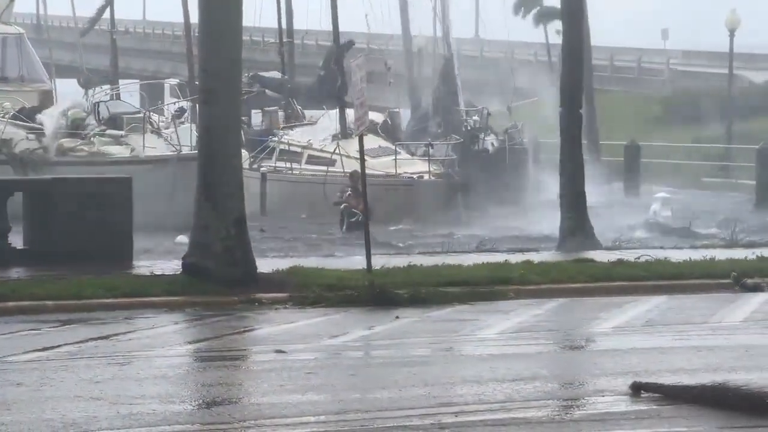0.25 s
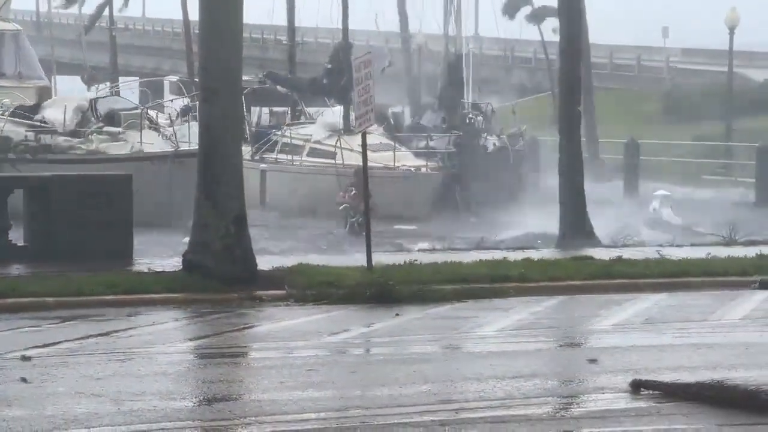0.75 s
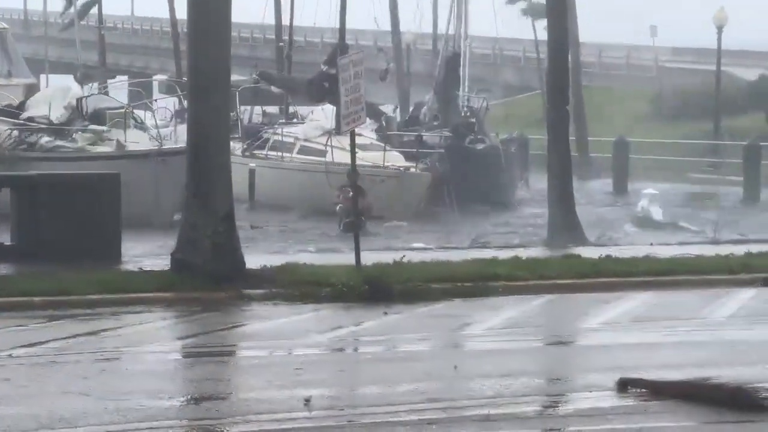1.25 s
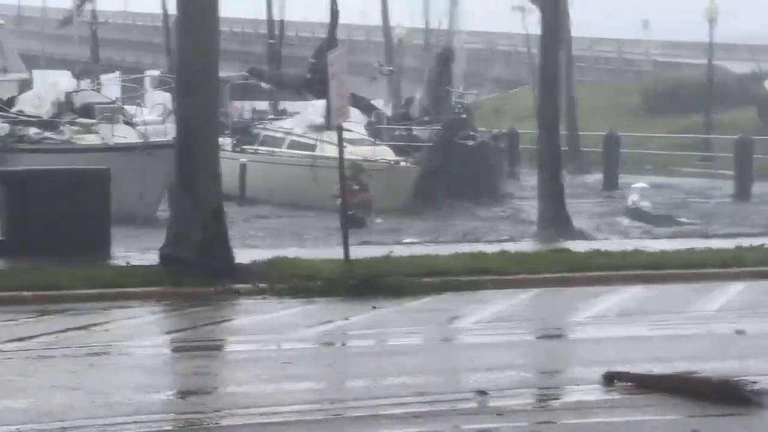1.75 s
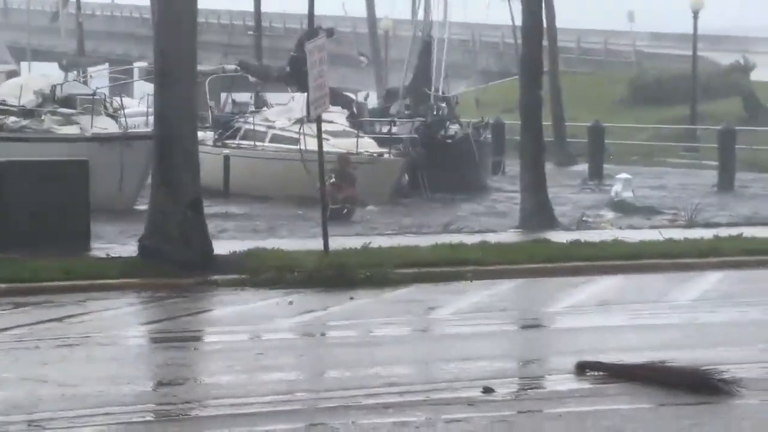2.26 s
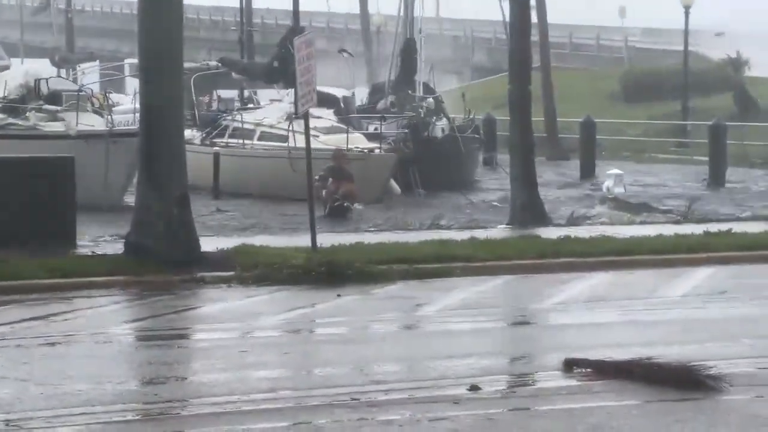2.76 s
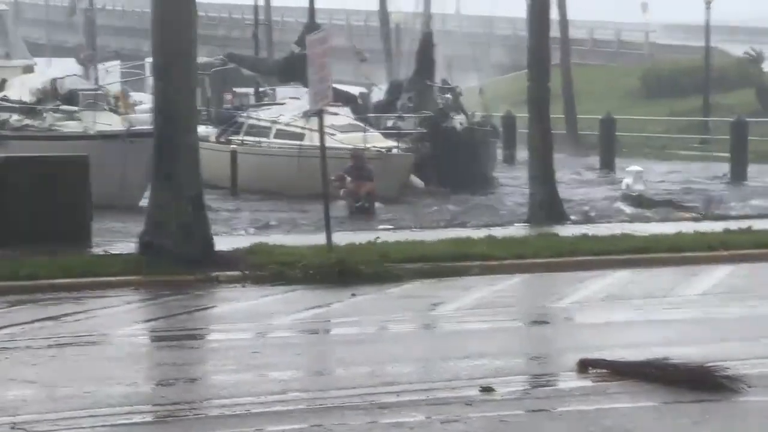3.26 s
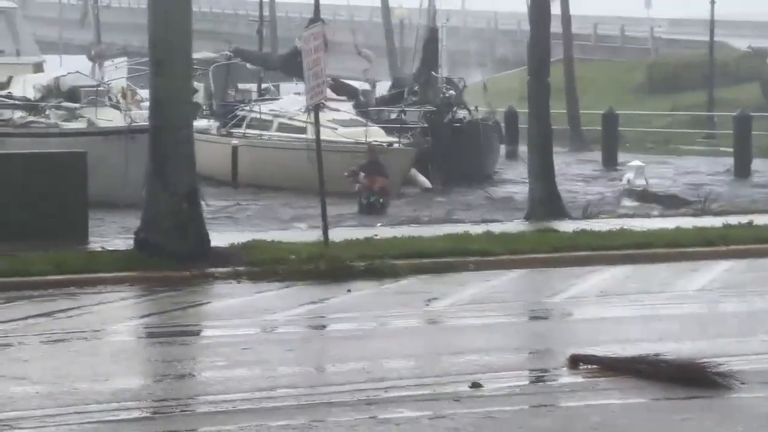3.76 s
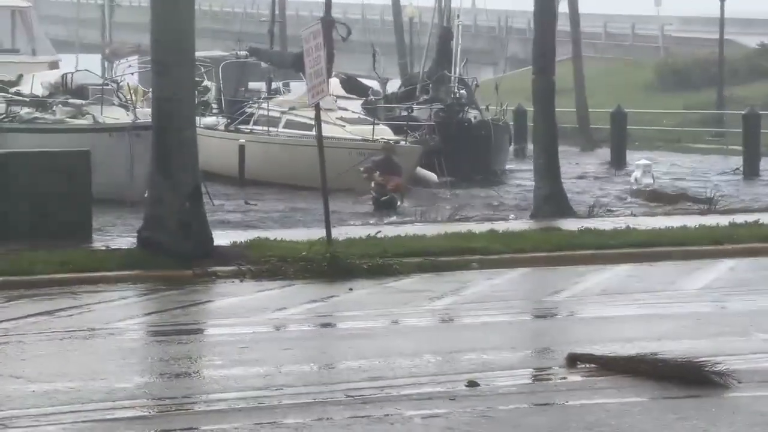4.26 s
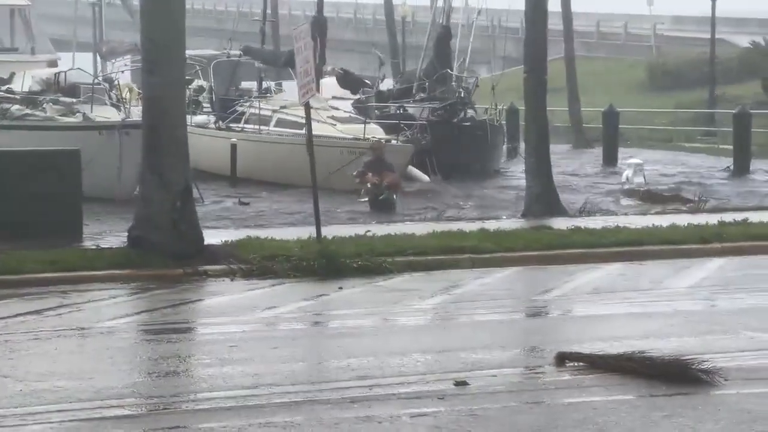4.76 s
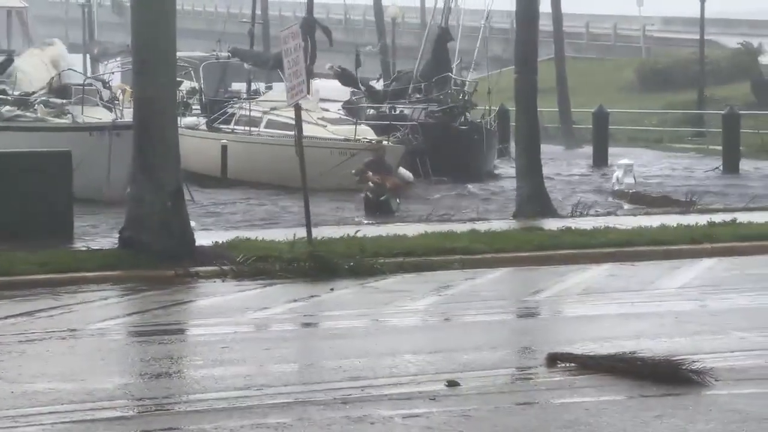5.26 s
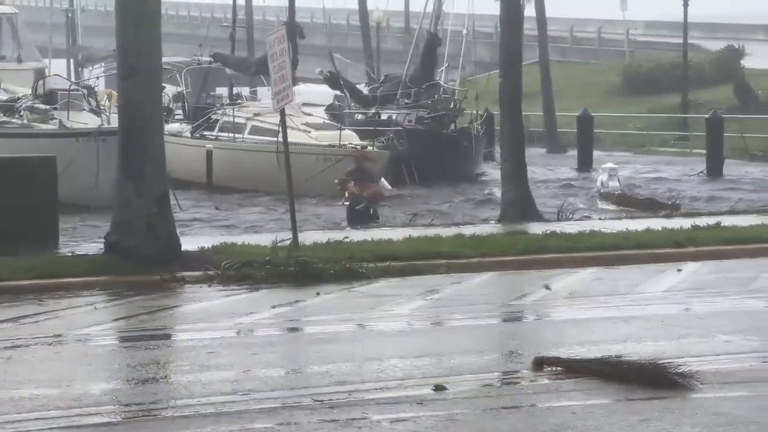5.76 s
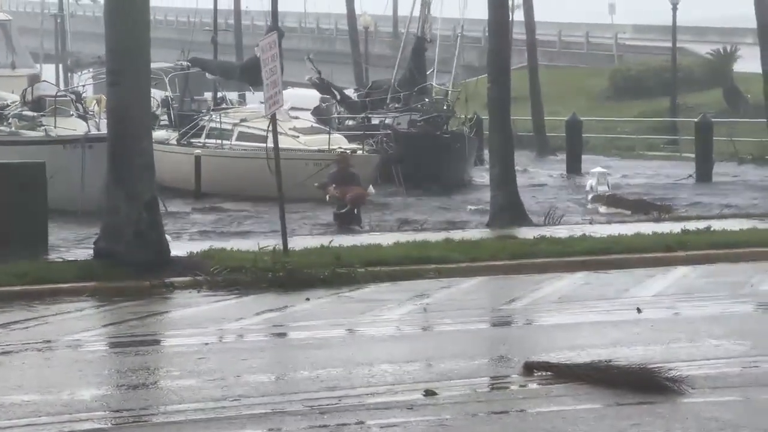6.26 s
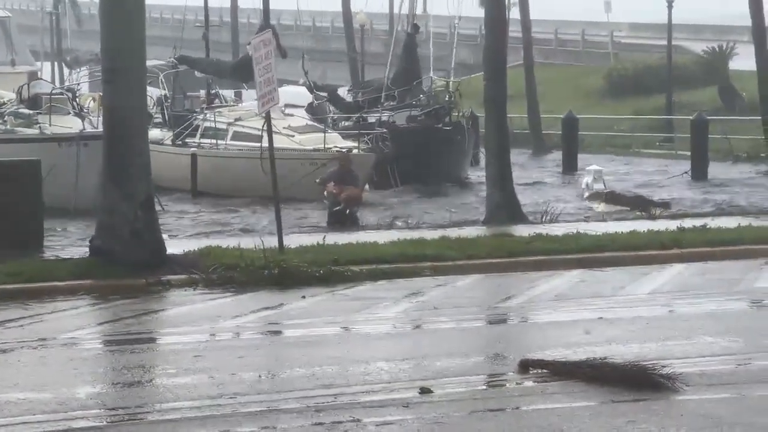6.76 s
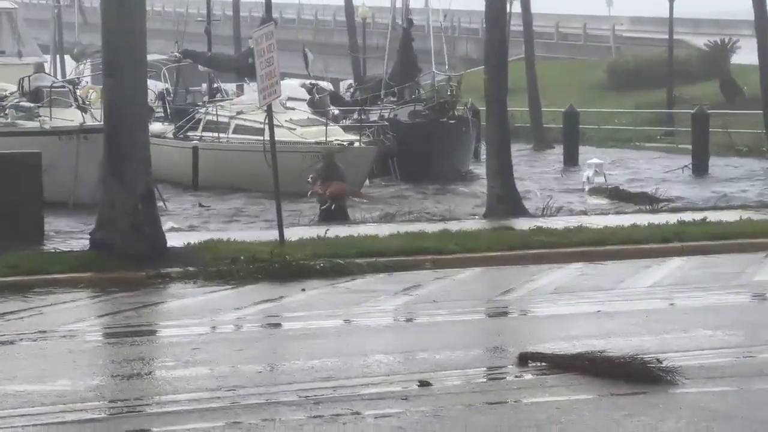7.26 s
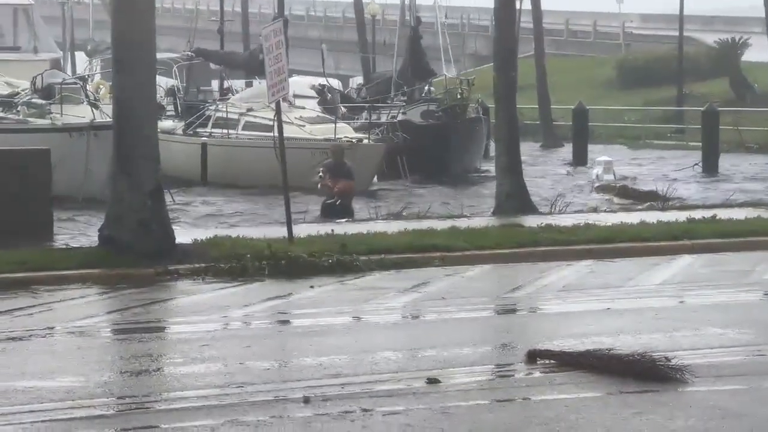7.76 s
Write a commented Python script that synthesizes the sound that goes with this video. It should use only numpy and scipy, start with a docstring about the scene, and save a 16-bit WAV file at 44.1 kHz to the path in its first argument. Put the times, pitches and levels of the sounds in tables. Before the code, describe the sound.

Violent wind buffets the microphone, thumping and popping densely, then lulls and returns as low hollow hooting gusts, with a few raindrop ticks.

```python
"""Storm wind tears across the microphone ports of a phone for eight seconds, over a far roar of trees and spray.
From the start, uneven noise makes rumble and ragged buffeting; noise bursts make puffs, falling chirps make pops.
The hardest puffs and pops crowd in from 1.2 s, with fine spray crackling on surges of air; a raindrop ticks at 2.4 s.
After a lull past 3.3 s a drop clicks and rings at 4.5 s, and a hollow, a resonance in the eddies, starts to howl.
The howl peaks near 6.2 s among strong gusts, with drops at 6.1 and 7.0 s, and the wind blows on to the end."""
import sys
import numpy as np
from scipy import signal
from scipy.fft import rfft, irfft, next_fast_len
from scipy.io import wavfile
from scipy.ndimage import uniform_filter1d, minimum_filter1d, map_coordinates

SR = 44100
rng = np.random.default_rng(int(sys.argv[2]) if len(sys.argv) > 2 else 0)


def store_pcm(level_fs):
    """Save levels as 16-bit WAV."""
    pcm = np.round(np.clip(level_fs, -1, 1) * 32767).astype(np.int16)
    wavfile.write(sys.argv[1], SR, np.atleast_2d(pcm).T)


N = 353531

# Event and wind levels are set ahead of any port filter and the limiter; colours give relative level per Hz.
# Wind between the gusts: t/s, buffeting level/dB, rumble level/dB
STEADY_WIND = [(0, -33.5, -26.5), (.58, -29, -38.5), (.85, -29, -30.5), (1.351, -31, -25.5),
               (1.9, -33, -25.5), (2.4, -26.5, -27), (2.899, -38, -28.5), (3.251, -30.5, -27),
               (3.5, -39, -35), (4.101, -41.5, -40), (4.399, -34.5, -30.5), (4.718, -41, -36),
               (5.2, -29.5, -27.5), (5.599, -33, -27), (6.1, -18.5, -26), (6.8, -20, -24),
               (7.151, -39, -33.5), (7.35, -29.5, -31), (7.75, -30, -30), (8.02, -27, -34)]
# Gusts over it: start t/s, held t/s, buffeting level/dB, rumble level/dB
GUST_EVENTS = [(0, 0.056, -16, -19), (0.104, 0.012, -23.5, -23.5), (0.209, 0.025, -21.5, -30),
               (0.288, .05, -25.5, -22.5), (0.599, 0.017, -25, -22), (0.659, 0.042, -17.5, -25),
               (0.78, 0.056, -36, -23), (.87, 0.052, -20.5, -23.5), (1.0, 0.019, -17.5, -27.5),
               (1.086, 0.19, -15, -20.5), (1.361, .13, -17, -18), (1.518, 0.12, -20.5, -15.5),
               (1.717, .09, -21.5, -20.5), (1.844, 0.005, -27, -30), (1.901, 0.019, -18.5, -28),
               (1.975, 0.061, -24, -32.5), (2.073, 0.046, -23.5, -20), (2.154, 0.13, -20.5, -25),
               (2.301, 0.063, -16, -14.5), (2.418, 0.11, -22, -25.5), (2.579, 0.045, -23, -20.5),
               (2.688, 0.12, -29.5, -21), (2.967, 0.24, -25.5, -31.5), (3.602, 0.16, -41.5, -47),
               (3.687, 0.03, -32, -31), (4.126, 0.065, -28.5, -37), (4.158, 0.026, -22.5, -30.5),
               (4.23, 0.11, -24, -39), (4.398, 0.1, -26, -27.5), (4.512, 0.066, -30.5, -29.5),
               (4.822, .08, -30, -35.5), (5.333, 0.1, -25, -36.5), (5.488, .12, -23, -25.5),
               (5.683, 0.091, -21.5, -28), (5.818, 0.13, -22.5, -30), (6.029, 0.091, -15, -21.5),
               (6.186, 0.054, -13.5, -15), (6.417, 0.071, -15, -25), (6.529, 0.097, -19.5, -21.5),
               (6.819, 0.086, -17, -23.5), (7.037, 0.03, -27.5, -26), (7.19, 0.071, -21.5, -28.5),
               (7.508, 0.061, -25.5, -24.5), (7.602, 0.15, -24.5, -24), (7.699, 0.26, -21.5, -22),
               (7.843, 0.11, -26.5, -28.5), (7.992, .04, -20, -24)]
# Far roar when the smoothed buffeting is at -22.5 dB: t/s, level/dB
FAR_ROAR = [(0, -43), (1, -45.5), (1.5, -46.5), (2.1, -46), (2.4, -40), (2.8, -49.5), (3.3, -44.5),
            (4.7, -44), (6, -42), (7, -44), (8.02, -44.5)]
# Colour of the far roar: f/Hz, level/dB
ROAR_COLOUR = [(300, -16), (900, 0), (1300, 1), (1800, -4.5), (2300, -16), (3000, -20), (3350, -24),
               (3750, -34), (5500, -45.5), (9000, -51), (10300, -51.5), (11500, -100)]
# Specks of spray at set times, strong and faint: t/s, level/dB (set for the core at full strength)
SET_SPECKS = [(0.032, -34.5), (1.094, -40.5), (1.1282, -36.5), (1.15, -41), (1.185, -43), (1.228, -36),
              (1.2693, -30), (1.3728, -33), (1.4118, -30), (1.4645, -37), (1.52, -36), (1.5429, -31.5),
              (1.548, -34.5), (1.578, -37.5), (1.613, -39.5), (1.6192, -33), (1.6463, -40), (1.7531, -38),
              (1.7763, -30), (1.778, -35), (1.81, -37), (1.85, -40.5), (1.91, -48), (2.321, -34),
              (2.343, -38.5), (2.377, -32.5), (2.44, -37), (2.466, -36), (2.5117, -50), (2.593, -38),
              (2.9732, -60), (2.9948, -34.5), (3.04, -52), (3.0869, -39.5), (3.1284, -34), (3.2137, -41.5),
              (3.9483, -42.5), (4.244, -42.5), (4.262, -46), (4.298, -41.5), (4.4267, -35), (4.444, -51),
              (5.6435, -47), (5.92, -39), (6.041, -35), (6.053, -41), (6.076, -35), (6.45, -37),
              (6.5884, -35.5), (6.876, -36)]
# Colour of a speck's sharp core: f/Hz, level/dB
SPECK_COLOUR = [(700, -27.5), (1800, 10), (3000, 3), (4500, -14.5), (6500, -25), (9000, -45.5),
                (11000, -75.5)]
# Raindrops: t/s, click peak level/dB, ring level/dB, left-right level/dB, ring t60/s, click low cut f/Hz
RAINDROPS = [(2.419, -27, -20, -3, .02, 12000), (4.4706, -13.5, 15, 2, .013, 500),
             (6.1065, -19, 2, 2, .02, 5000), (7.034, -11.5, 15.5, 3, .017, 700)]
# Colour of a raindrop's click: f/Hz, level/dB
CLICK_COLOUR = [(300, 7.5), (1200, 19), (3000, -0.5), (6000, -19.5), (8500, -32.5), (10500, -47.5),
                (16000, -55)]
# Pops at set times: t/s, peak level/dB, glide t/s, cycles per e-fold of the glide
POP_EVENTS = [(0.6156, -12, 0.0022, 0.84), (0.6616, -8.5, .0012, 1.6), (0.6765, -10.5, 0.0016, 1.6),
              (1.3743, -5, .0013, 2.2), (1.4199, -5, 0.00097, 2.2), (1.465, -11.5, 0.0014, 1.6),
              (1.618, -11, 0.0015, 2.2), (1.776, -7.5, .0016, 3), (1.806, -15.5, .0012, 2.6),
              (1.846, -18, 0.0015, 2.4), (1.9045, -12, 0.0013, 2.6), (2.076, -16.5, 0.001, 2.4),
              (2.583, -17.5, 0.0012, 2.4), (3.084, -10.5, .0014, 2.2), (3.126, -11.5, 0.001, 2.4),
              (3.286, -33, 0.0011, 2.8), (3.3225, -19, .0012, 2.8), (3.602, -25, .0013, 2.4),
              (4.429, -8, 0.0015, 2.2), (5.529, -18.5, .0014, 3), (6.03, -14.5, 0.0011, 3),
              (6.195, -15, .0016, 3), (6.716, -19.5, 0.0015, 3)]
# Sudden puffs: t/s, peak level/dB, thump peak level/dB
PUFF_EVENTS = [(0.032, -15, -20.5), (0.298, -15, -9), (0.492, -13.5, -23), (0.219, -17, -23.5),
               (.661, -7, -14), (0.679, -12.5, -21), (0.914, -11.5, -26), (1.013, -18, -15),
               (1.091, -10.5, -28.5), (1.261, 1.5, -13), (1.268, -7.5, -16), (1.375, -5, -27.5),
               (1.42, 4, -18.5), (1.465, -9, -23), (1.526, -6, -17.5), (1.542, 3.5, -14.5),
               (1.579, -9.5, -11.5), (1.608, -13, -18), (1.62, -10.5, -12), (1.636, -9, -12.5),
               (1.648, -8, -11.5), (1.706, -14, -27), (1.752, -5, -18), (1.774, -0.5, -8), (1.81, -10, -14),
               (1.85, -3, -20.5), (1.906, -10, -4.5), (1.98, -14, -29), (2.078, -9.5, -20.5),
               (2.165, -12.5, -23.5), (2.214, -11.5, -13.5), (2.249, -13.5, -23), (2.318, -12.5, -10.5),
               (2.343, -9, -14), (2.379, -16, -18.5), (2.431, -8.5, -11), (2.464, -12, -28.5),
               (2.483, -11, -26), (2.499, -18, -28.5), (2.512, -14, -23.5), (2.542, -8.5, -18),
               (2.584, -7.5, -15), (2.688, -8.5, -18.5), (2.731, -14, -26), (2.749, -10.5, -19),
               (2.78, -11, -14), (2.864, -21, -23), (2.99, -13.5, -29.5), (2.999, -11.5, -14),
               (3.04, -13, -23.5), (3.056, -14.5, -29), (3.086, -14, -17), (3.13, -7, -12),
               (3.257, -21, -33), (3.289, -15.5, -30.5), (3.323, -12.5, -42.5), (3.601, -14.5, -32.5),
               (3.618, -14, -44), (3.935, -20.5, -48), (4.165, -16, -38.5), (4.194, -18.5, -37.5),
               (4.229, -17, -23.5), (4.243, -11, -29.5), (4.294, -13.5, -29.5), (4.323, -19, -27),
               (4.342, -15.5, -32), (4.404, -20, -29.5), (4.429, -14, -13), (4.442, -7.5, -18.5),
               (5.147, -14.5, -22.5), (5.471, -13.5, -23), (5.528, -9, -23), (5.594, -14, -30.5),
               (5.684, -12, -17), (5.919, -7, -29), (6.03, -8, -40.5), (6.068, -11.5, -38.5),
               (6.196, -4, -22.5), (6.431, 1.5, -28.5), (6.584, -8, -14.5), (6.647, -3.5, -25.5),
               (6.718, -9.5, -33), (6.826, -10.5, -32.5), (6.877, -7, -31), (7.213, -15.5, -33.5),
               (7.393, -12.5, -41.5), (7.774, -7, -28.5)]
# Low rumble and the thump of a puff: f/Hz, level/dB
RUMBLE_COLOUR = [(15, -14), (30, -13), (60, 4), (110, 2), (200, -4.5), (400, -22), (1200, -110)]
# Rough buffeting: f/Hz, level/dB
BUFFET_COLOUR = [(30, -39.5), (120, -14), (300, 7), (500, 3), (680, 3), (780, -1.5), (860, -4), (960, -6),
                 (1400, -17), (2000, -30.5), (2800, -51), (4000, -72.5), (8000, -85.5), (11000, -125)]
# Big eddies: f/Hz, level/dB
BIG_EDDY_COLOUR = [(60, -25), (150, -6), (280, 7), (420, -3), (700, -36), (1500, -110)]
# Bright edge of puffs, surges and rasp: f/Hz, level/dB
EDGE_COLOUR = [(500, -12), (1200, 12.5), (2000, -1.5), (3000, -26.5), (5000, -43), (8000, -54.5),
               (11000, -90.5)]
# Parts against the rough buffeting: t/s, howl level/dB, big eddies level/dB, upper note level/dB
SHADES = [(0, -30, 5, -9.5), (.7, -26, 3, -13), (1.1, -29.5, 2, -6.5), (2, -26.5, -3, -9.5),
          (2.4, -26, -5.5, -7), (3, -23.5, -2.5, -5), (3.7, -29.5, -15.5, -6.5), (4.2, -33, -11, -2.5),
          (4.5, -9, -12.5, -10), (5.2, -5.5, -11.5, -8), (6.2, 0, -5.5, -6), (7.2, -3.5, -11.5, -10.5),
          (8.02, -8, -1.5, -12)]
# Likeness of the two ports: f/Hz, correlation (0 to 1)
PORT_LIKENESS = [(60, 0.88), (170, 0.81), (400, 0.93), (700, 0.97), (1000, 0.64), (1500, 0.43),
                 (2700, 0.38), (4500, 1)]
# Balance of the two ports: f/Hz, left-right level/dB
PORT_LEAN = [(60, 0.5), (340, 0), (650, 2), (950, 3), (1340, -4.5), (1900, -7), (2700, -10), (5000, -1.5)]

RISE_S, FALL_S = 0.009, .02  # gust power: squared ramp up; fades with time constant FALL_S / 2
ROAR_FOLLOWS, ROAR_LAG_S = 0.32, 0.043  # dB per dB of buffeting; smoothing window
SPECKS, SPECK_DB, SPECK_SCATTER_DB = 60, -62.5, 1.5  # chance specks: count, base at -25.5 dB buffeting, spread
SPECK_GROWS = .5  # dB gained per dB of buffeting, beyond keeping pace with it
CORE_GROWS = .9  # dB of sharp core lost per dB that a speck lies below -34 dB
SURGE_DB, SURGE_S = 11.5, 0.011  # surge peak over the speck level; swell and fade time constant
SPLASH_DB, SPLASH_T60_S = -27, .016  # splash noise against the click's impulse, before colouring
AFTER_DB, AFTER_LASTS = -25.5, 3  # weak after-ring against the ring; how many times longer
POP_SWELL, POP_FADE, POP_DULL_HZ = 1.3, 3.4, 2100  # swell and fade in glide times; treble limit
PATTER, PATTER_DB, PATTER_SCATTER_DB = 260, 0, 3.5  # chance pops: count, dB over the buffeting, spread
PUFF_T60_S, EDGE_T60_S = 0.022, .035
EDGE_DB, EDGE_SCATTER_DB = -28, 0.5  # bright edge against the puff, before howl dulls it; spread
RASP_DB, RASP_GROWS = -33, .45  # rasp against a buffeting of -13.5 dB; extra dB per dB of buffeting
HOLLOW_HZ, HOLLOW_WIDTH_HZ = 638, 100
UPPER_HZ, UPPER_WIDTH_HZ = 765, 200
WAVER, WAVER_RATE = .028, 9  # howl's detuning either way as a share; knots a second
HOWL_SMOOTHS_DB = 3  # unevenness of the eddies lost per unit of howl
HOWL_DULLS_DB = 2  # puff edge and chance speck level lost per unit of howl
HOWL_CALMS_DB = 5  # chance pop level lost per unit of howl
TOP_HZ = 15600  # band limit


def amp(db):
    """Amplitude from dB."""
    return 10 ** (np.asarray(db) / 20)


def unit(x):
    """x at an RMS of one."""
    return x / np.sqrt(np.mean(x ** 2) + 1e-20)


def along(points, hz):
    """Read (f/Hz, value) points on a log frequency axis."""
    f, v = np.transpose(points)
    return np.interp(np.log(hz + 1), np.log(f + 1), v)


def curves(rows):
    """One value per sample for each column after the time."""
    s, *cols = np.transpose(rows)
    return [np.interp(np.arange(N) / SR, s, c) for c in cols]


def howl_at(s):
    """Howl amplitude against the rough buffeting at the times s."""
    when, howl_db, *_ = np.transpose(SHADES)
    return amp(np.interp(s, when, howl_db))


def wobble(rate):
    """A smooth random curve, rate knots a second."""
    knots = rng.standard_normal(int(N * rate / SR) + 4)
    return map_coordinates(knots, [np.arange(N) * rate / SR])


def filtered(x, response):
    """x passed through a complex response of frequency."""
    n = x.shape[-1]
    m = next_fast_len(n + 8192)  # room for the tail
    return irfft(rfft(x, m) * response(np.fft.rfftfreq(m, 1 / SR)), m)[..., :n]


def causal(spectrum):
    """Minimum-phase response: this colour, with no sound ahead of its cause."""
    def response(hz):
        cep = irfft(np.log(amp(along(spectrum, hz))))
        half = len(cep) // 2
        cep[1:half] *= 2
        cep[half + 1:] = 0
        return np.exp(rfft(cep))
    return response


def hollow(c, w):
    """An air resonance at c Hz, w Hz wide, with steep flanks and little treble."""
    def response(hz):
        resonance = 1j * hz * w / (c * c - hz * hz + 1j * hz * w)
        return resonance ** 2 / (1 + 1j * hz / 900) ** 4
    return response


def lean(hz):
    """Left and right gain of the ports at each frequency."""
    return amp(along(PORT_LEAN, hz) / 2 * np.array([[1], [-1]]))


def ports(pair):
    """Blend two unrelated signals so that the ports get their likeness and balance."""
    def share(hz):
        turn = np.arccos(np.clip(along(PORT_LIKENESS, hz), -1, 1)) / 2
        return [np.cos(turn), np.sin(turn)]
    mid, side = filtered(pair, share)
    return filtered(np.stack([mid + side, mid - side], axis=-2), lean)


def air():
    """Buffeting and rumble levels in dB: power of the steady wind plus gusts that rise, hold and fall."""
    t = np.arange(0, N + 64, 32) / SR
    s, held, *gust_db = np.transpose(GUST_EVENTS)[:, :, None]
    rise = np.clip((t - s) / RISE_S, 0, 1) ** 2
    shape = rise * np.exp(-np.maximum(t - s - held, 0) / FALL_S * 2)
    levels = []
    for calm_db, peak_db in zip(curves(STEADY_WIND), gust_db):
        gust_power = (amp(peak_db) ** 2 * shape).sum(axis=0)
        gust_power = np.interp(np.arange(N) / SR, t, gust_power)
        levels.append(10 * np.log10(amp(calm_db) ** 2 + gust_power))
    return levels


def roar(buffet_db):
    """Far trees and spray: noise with soft patches in time and pitch that swells a little with the wind."""
    smooth_db = uniform_filter1d(buffet_db, size=int(ROAR_LAG_S * SR))
    level_db = curves(FAR_ROAR)[0] + ROAR_FOLLOWS * (smooth_db + 22.5)
    z = signal.stft(rng.standard_normal((2, N)), nperseg=512)[2]
    field = uniform_filter1d(rng.standard_normal(z.shape[1:]), size=5, axis=0)
    field = uniform_filter1d(field, size=10, axis=1)
    patchy = signal.istft(z * amp(2 * unit(field)), nperseg=512)[1][:, :N]
    return ports(amp(level_db) * unit(filtered(patchy, causal(ROAR_COLOUR))))


def spray(buffet_db):
    """Each speck is a tiny crackle of a few milliseconds on the crest of a bright surge of air."""
    when, luck = rng.random((SPECKS, 2)).T
    wind_db = buffet_db[(when * (N - 1)).astype(int)]
    chance_db = SPECK_DB + (1 + SPECK_GROWS) * (wind_db + 25.5)
    chance_db -= HOWL_DULLS_DB * howl_at(when * N / SR) + SPECK_SCATTER_DB * np.log(luck + 1e-2)
    s, db = np.transpose(SET_SPECKS)
    s = np.append(s, when * (N - 1) / SR)
    db = np.append(db, chance_db)

    lead = SR // 40  # the surge starts ahead of the speck
    around = np.arange(-lead, lead) / SR
    t = np.maximum(around, 0)
    top = lambda x: x / np.abs(x[:, :1]).max(axis=-1, keepdims=True)
    noise = rng.standard_normal((len(s), 2, 2, len(t)))
    surges = filtered(noise[:, 1] * np.exp(-np.abs(around) / SURGE_S), causal(EDGE_COLOUR))
    cores = filtered(noise[:, 0] * t * amp(-60 * t / .009), causal(SPECK_COLOUR))
    core_gain = amp(CORE_GROWS * np.minimum(db + 34, 0))[:, None, None]  # weak specks are dull
    specks = core_gain * top(cores) + amp(SURGE_DB) * top(surges)
    pair = np.zeros((2, N + SR))
    for start, level_db, speck in zip(np.round(s * SR).astype(int), db, specks):
        pair[:, start:start + len(t)] += amp(level_db) * speck
    return ports(pair[:, lead:N + lead])


def drops():
    """A drop clicks and splashes on the housing; a short low ring swells just after, glides down and fades."""
    out, t = np.zeros((2, N + SR)), np.arange(SR // 10) / SR
    swell = (1 - np.exp(-t / .0022)) ** 3
    note = swell * np.sin(2 * np.pi * 590 * t - 6 * np.exp(-t / .004))  # glides down to 590 Hz
    for s, db, ring_db, pan_db, t60, cut_hz in RAINDROPS:
        splash = amp(SPLASH_DB - 60 * t / SPLASH_T60_S) * rng.standard_normal((2, len(t)))
        click = filtered((t == 0) + splash, causal(CLICK_COLOUR))
        click = filtered(click, lambda hz: (1j * hz / (cut_hz + 1j * hz)) ** 2)
        click = amp(db) * click / np.abs(click).max()
        fade = amp(-60 * t / t60) + amp(AFTER_DB - 60 * t / t60 / AFTER_LASTS)
        pan = amp([[pan_db / 2], [-pan_db / 2]])
        start = round(s * SR)
        out[:, start:start + len(t)] += (click + amp(ring_db) * fade * note) * pan
    return out[:, :N]


def pops(buffet_db):
    """A pop is one slap of air, heard through the phone as a quick chirp falling from treble to bass."""
    out, t = np.zeros(N + SR), np.arange(SR // 20) / SR
    luck = rng.random((len(POP_EVENTS) + PATTER, 5))
    phase = luck[:, :1]
    when, size, quick, bright = luck[len(POP_EVENTS):, 1:].T
    chance_db = buffet_db[(when * N).astype(int)] + PATTER_DB - HOWL_CALMS_DB * howl_at(when * N / SR)
    chance_db += PATTER_SCATTER_DB * (2 * size - 1)
    chance = [when * N / SR, chance_db, 0.000811 + 0.00068 * quick, 1.588 + 1.38 * bright]
    s, db, glide_s, turns = np.hstack([np.transpose(POP_EVENTS), chance])[:, :, None]
    u = t / np.maximum(glide_s, 1e-4)  # time in glide times
    shape = (1 - np.exp(-u / POP_SWELL)) ** 2 * np.exp(-u / POP_FADE)
    chirps = shape * np.sin(2 * np.pi * (turns * np.log(1 + u) + phase))
    chirps = amp(db) * chirps / np.abs(chirps).max(axis=1, keepdims=True)
    for start, chirp in zip(np.round(s[:, 0] * SR).astype(int), chirps):
        out[start:start + len(t)] += chirp
    return filtered(out[:N], lambda hz: lean(hz) / (1 + 1j * hz / POP_DULL_HZ) ** 2)


def puffs():
    """A puff is a short burst of eddies with a bright edge and a slower, low thump of pressure."""
    s, db, thump_db = np.transpose(PUFF_EVENTS)[:, :, None]
    edge_db = EDGE_DB + EDGE_SCATTER_DB * rng.standard_normal(s.shape)
    t = np.arange(SR // 5) / SR
    top = lambda x: x / np.abs(x[0]).max(axis=-1, keepdims=True)
    eddies, pressure = rng.standard_normal((len(s), 2, 2, len(t))).transpose(1, 2, 0, 3)
    front = 1 + 6.9 * amp(-60 * t / 0.0013)  # extra weight on the first eddies
    burst = eddies * front * (1 - np.exp(-t / 0.0028)) * amp(-60 * t / PUFF_T60_S)
    push = pressure * (1 - np.exp(-t / 0.0066)) * amp(-60 * t / 0.038)
    crackle = eddies * t * amp(-60 * t / EDGE_T60_S)  # swells a little later than the burst and outlasts it

    when, _, _, upper_db = np.transpose(SHADES)
    howl, upper = howl_at(s), amp(np.interp(s, when, upper_db))
    body = top(filtered(burst, causal(BUFFET_COLOUR)))
    body = body + howl * top(filtered(burst, hollow(HOLLOW_HZ, HOLLOW_WIDTH_HZ)))
    body = top(body + upper * top(filtered(burst, hollow(UPPER_HZ, UPPER_WIDTH_HZ))))
    edge = amp(edge_db - HOWL_DULLS_DB * howl) * top(filtered(crackle, causal(EDGE_COLOUR)))
    thump = amp(thump_db) * top(filtered(push, causal(RUMBLE_COLOUR)))
    sound = amp(db) * (body + edge) + thump
    pair = np.zeros((2, N + SR))
    for k, start in enumerate(np.round(s[:, 0] * SR).astype(int)):
        pair[:, start:start + len(t)] += sound[:, k]
    return ports(pair[:, :N])


def buffeting(buffet_db, rumble_db):
    """Uneven but bounded eddies hit the ports and blow across the hollow, above a separate low rumble."""
    howl, weight, upper = amp(curves(SHADES))
    ragged = np.tanh(.15 * wobble(25) + .4 * wobble(60) + .4 * wobble(170))
    eddies = amp((9 - HOWL_SMOOTHS_DB * howl) * ragged) * rng.standard_normal((2, N))
    colour = lambda response: unit(filtered(eddies, response))
    rough, big, rasp = (colour(causal(c)) for c in (BUFFET_COLOUR, BIG_EDDY_COLOUR, EDGE_COLOUR))
    high = colour(hollow(UPPER_HZ, UPPER_WIDTH_HZ))

    # The howl wavers by crossfading a flat and a sharp resonance
    flat = colour(hollow(HOLLOW_HZ * (1 - WAVER), HOLLOW_WIDTH_HZ))
    sharp = colour(hollow(HOLLOW_HZ * (1 + WAVER), HOLLOW_WIDTH_HZ))
    drift = np.pi / 4 * (1 + np.tanh(wobble(WAVER_RATE)))
    hoot = unit(np.cos(drift) * flat + np.sin(drift) * sharp)

    mix = rough + howl * hoot + weight * big + upper * high
    mix = mix / np.sqrt(1 + howl ** 2 + weight ** 2 + upper ** 2)
    mix = mix + amp(RASP_DB + RASP_GROWS * (buffet_db + 13.5)) * rasp  # stronger air sounds brighter
    lows = amp(2.8 * wobble(18)) * rng.standard_normal((2, N))
    rumble = unit(filtered(lows, causal(RUMBLE_COLOUR)))
    return ports(amp(buffet_db) * mix + amp(rumble_db) * rumble)


def scene():
    """Roar, buffeting, chance specks and chance pops follow one wind; the listed events keep set levels."""
    buffet_db, rumble_db = air()
    background = roar(buffet_db) + spray(buffet_db) + drops()
    return background + pops(buffet_db) + puffs() + buffeting(buffet_db, rumble_db)


def record(dry):
    """A look-ahead limiter holds the loudest moments down; a steep filter cuts all above the band limit."""
    need = np.minimum(1, .92 / (np.abs(dry).max(axis=0) + 1e-9))
    gain = minimum_filter1d(need, size=441)  # 10 ms window
    gain = uniform_filter1d(uniform_filter1d(gain, size=220), size=220)
    return filtered(dry * gain, lambda hz: hz < TOP_HZ)


dry = scene()
out = record(dry)
store_pcm(out)
```